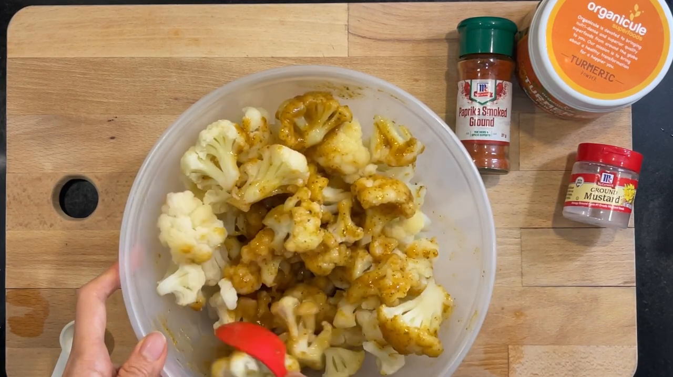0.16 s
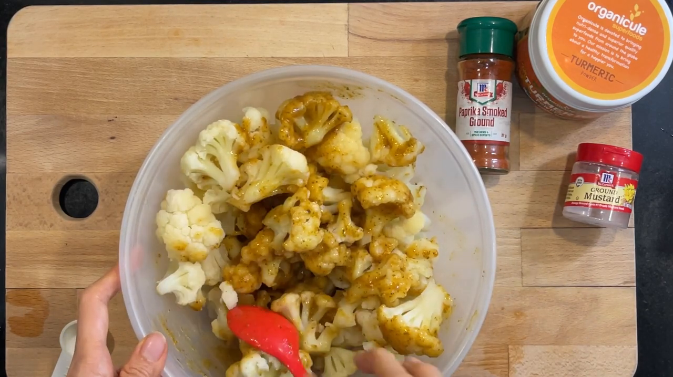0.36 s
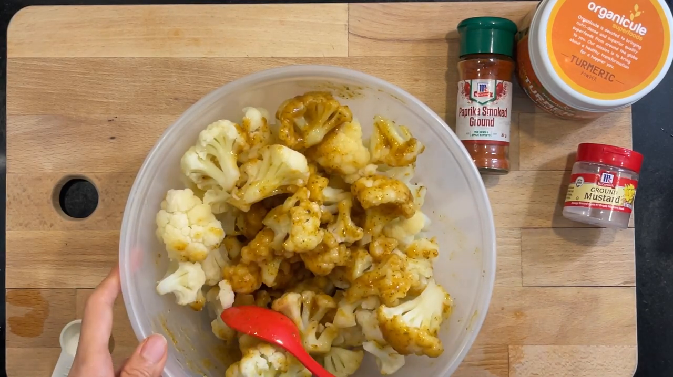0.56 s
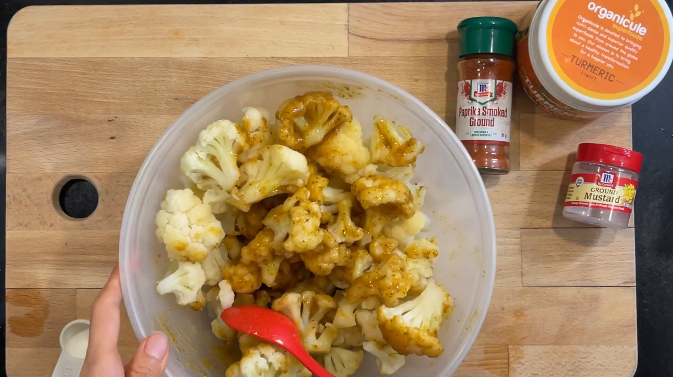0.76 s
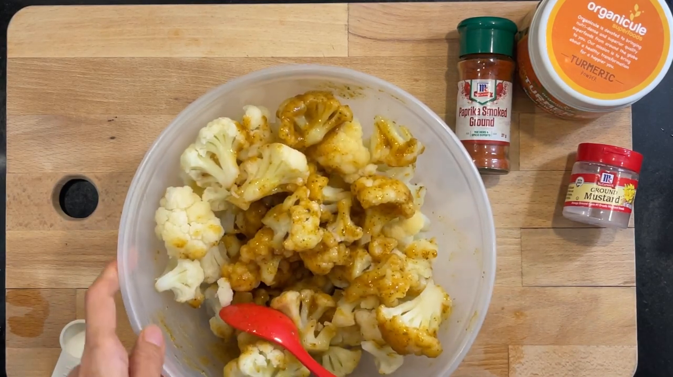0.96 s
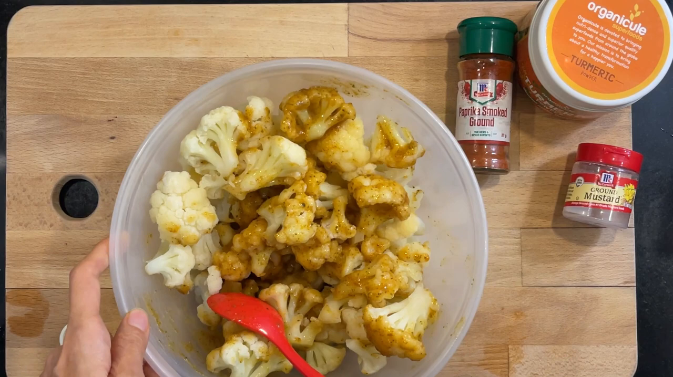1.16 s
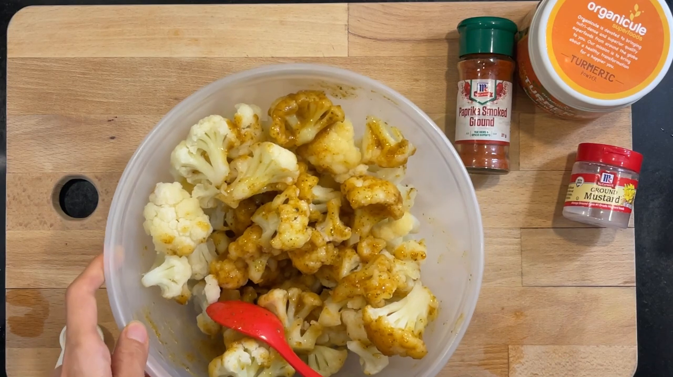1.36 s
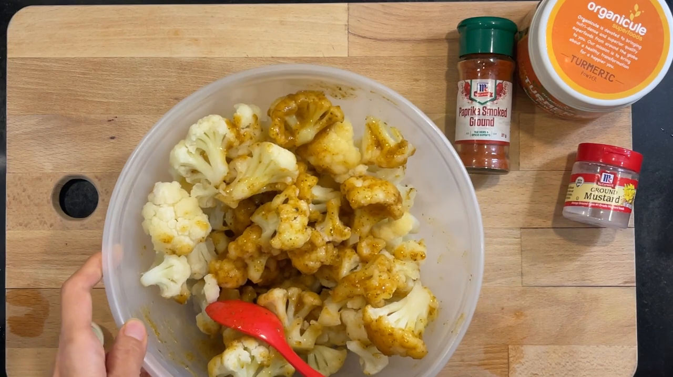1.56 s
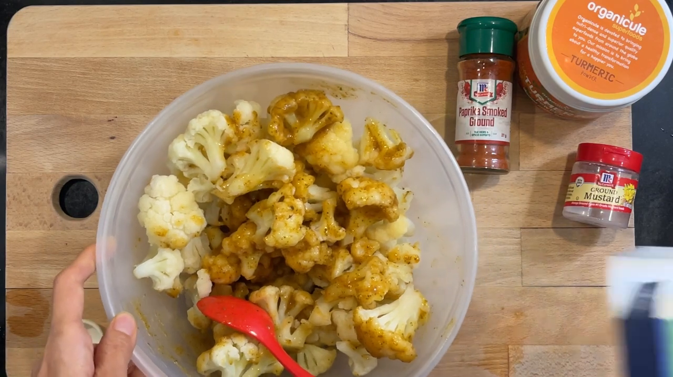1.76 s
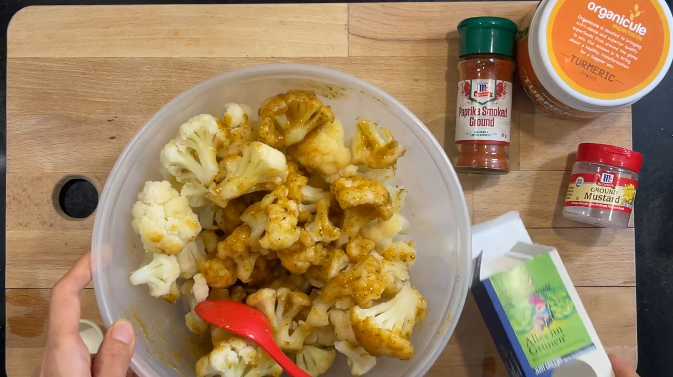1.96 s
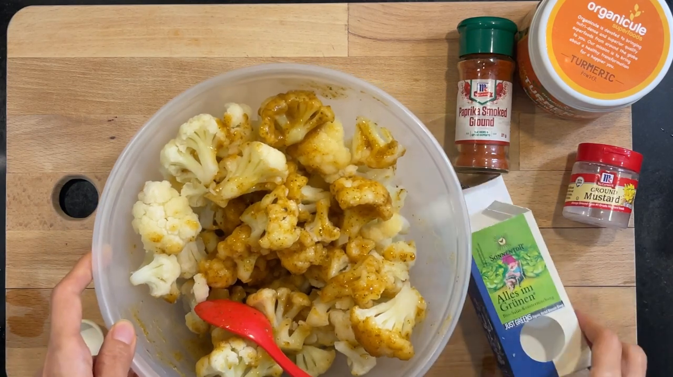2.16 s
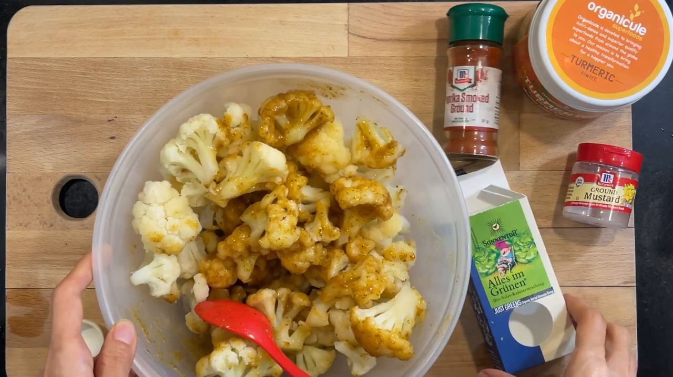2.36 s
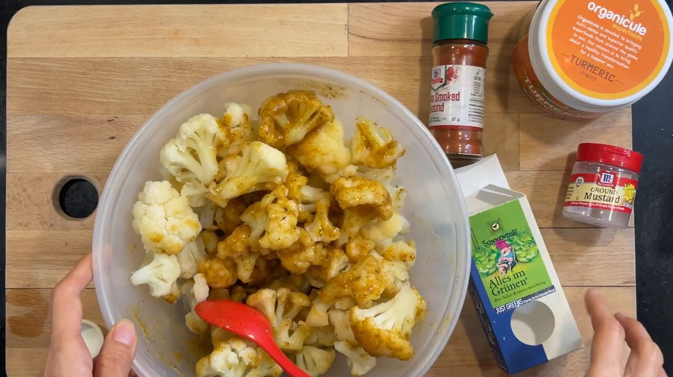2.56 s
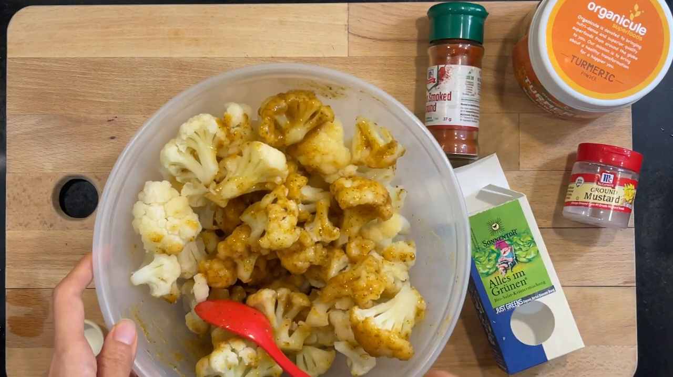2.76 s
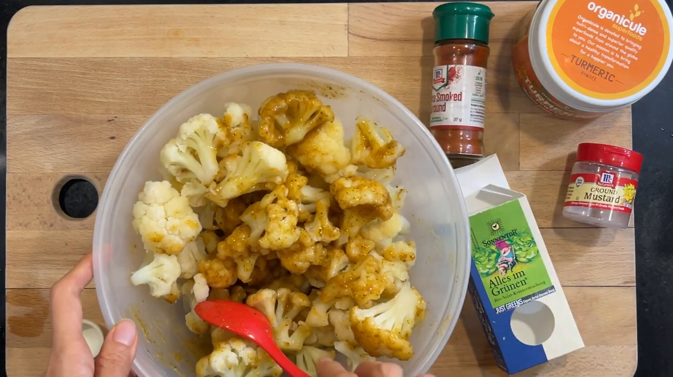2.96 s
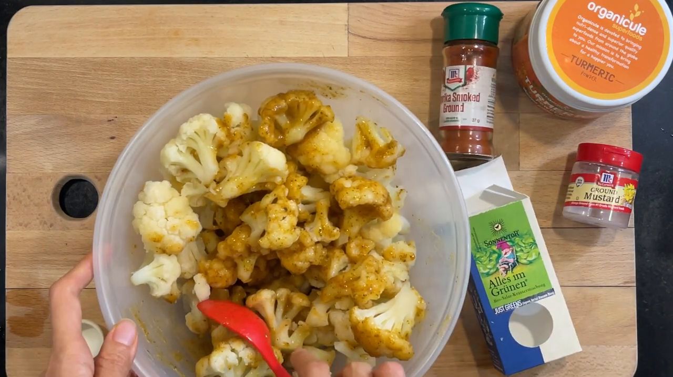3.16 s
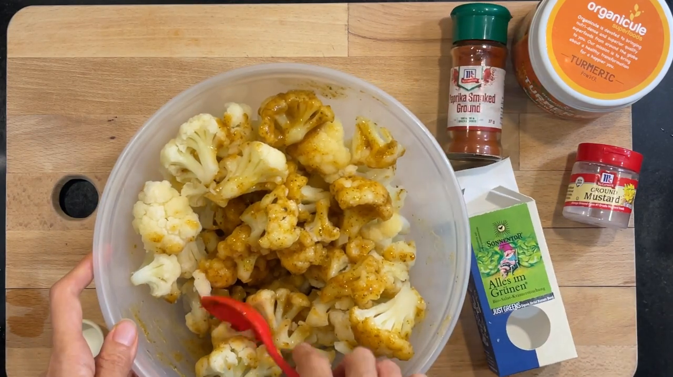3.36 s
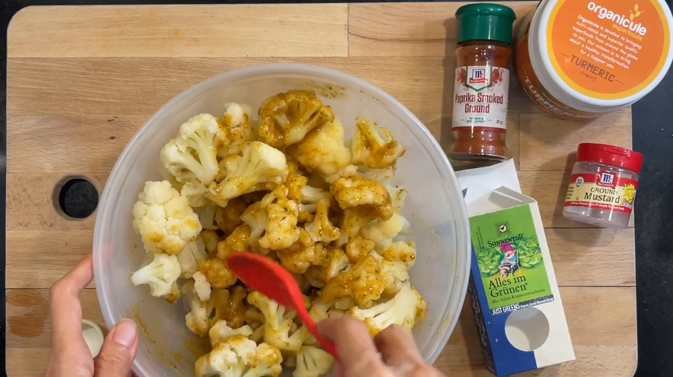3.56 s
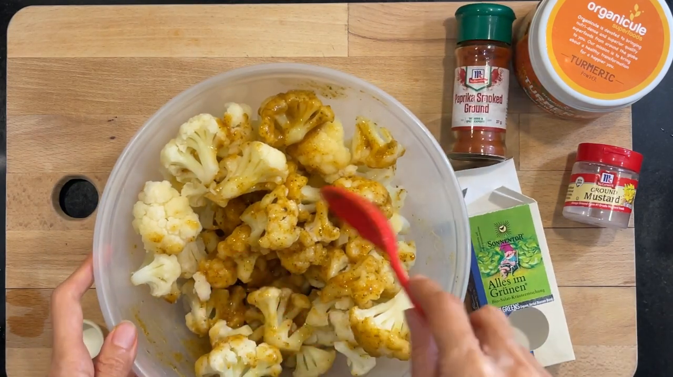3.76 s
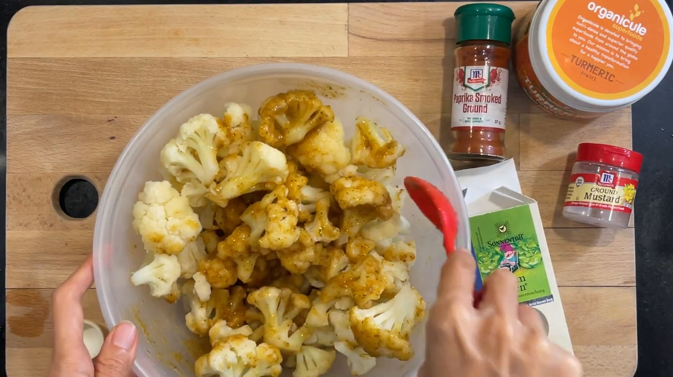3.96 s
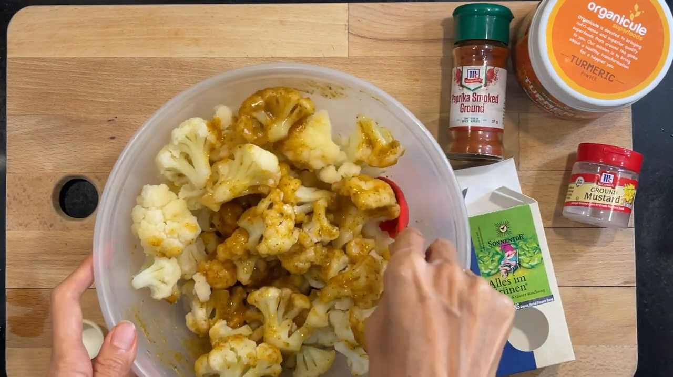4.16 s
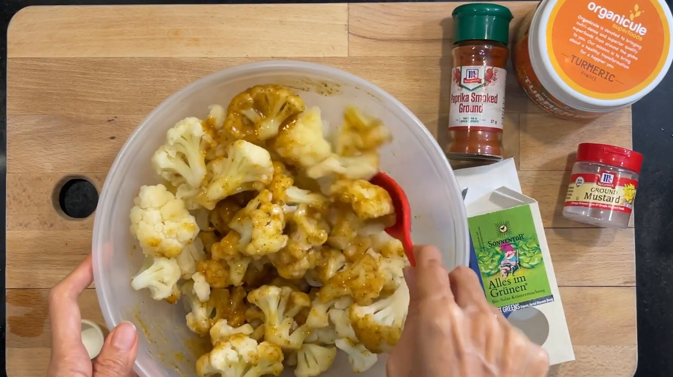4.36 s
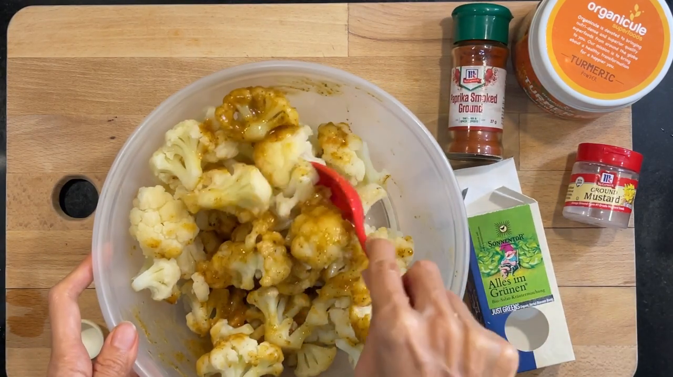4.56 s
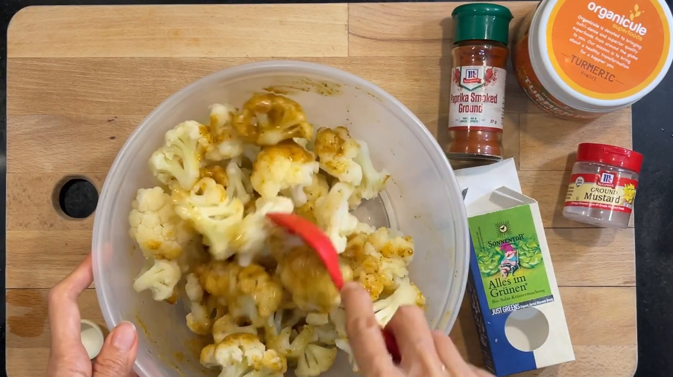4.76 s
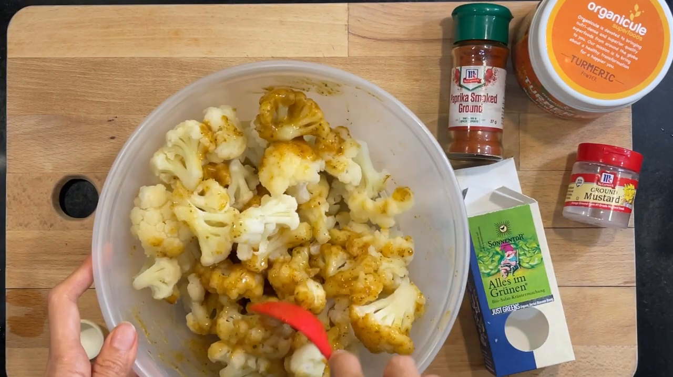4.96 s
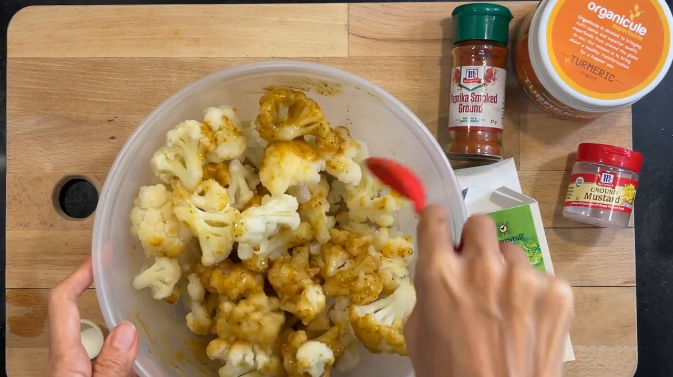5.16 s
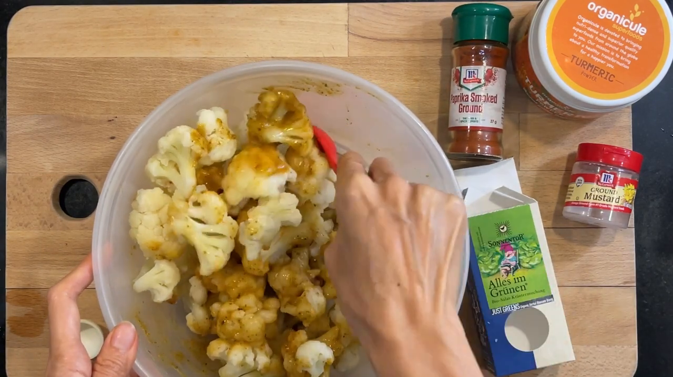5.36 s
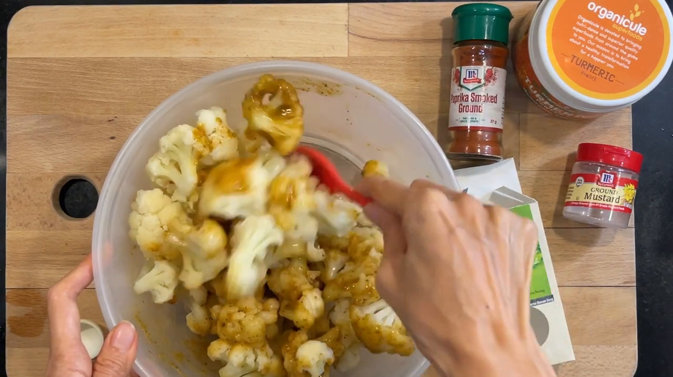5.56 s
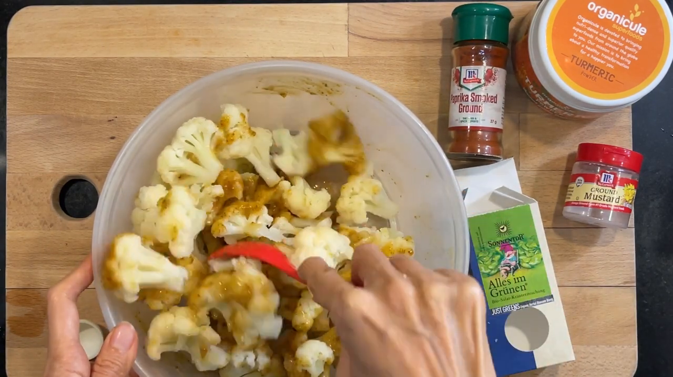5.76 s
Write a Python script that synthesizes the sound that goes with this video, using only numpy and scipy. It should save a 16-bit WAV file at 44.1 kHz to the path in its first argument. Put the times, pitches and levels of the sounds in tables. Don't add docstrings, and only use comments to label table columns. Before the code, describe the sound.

In a small kitchen, a spoon knocks a plastic bowl once sharply, then taps and scrapes lightly. A quiet stretch follows with faint hand and carton rustling and a brief glassy slide of a jar over wood. Later, tossing resumes with hard hollow knocks, clicks and short scrapes. A low uneven motor hum runs throughout, picked up by a close stereo phone.

```python
import sys
import numpy as np
from scipy import signal
from scipy.fft import rfft, irfft, next_fast_len
from scipy.io import wavfile
from scipy.ndimage import uniform_filter1d

SR = 44100
rng = np.random.default_rng(int(sys.argv[2]) if len(sys.argv) > 2 else 0)


def waveform_to_disk(signal):
    frames = np.transpose(np.atleast_2d(signal))
    scaled = np.clip(frames, -1, 1) * 32767
    samples = np.round(scaled).astype(np.int16)
    wavfile.write(sys.argv[1], SR, samples)


def natural_amplitude(level_db):
    exponent = np.asarray(level_db, float) / 20
    return 10 ** exponent


N = 256662

# middle_s, half_length_s, level_db
HUM_SURGES = [(0.17, 0.14, -37.5), (0.495, 0.09, -44), (0.794, 0.047, -44), (1.107, 0.13, -45.5),
              (1.48, 0.18, -38.5), (1.764, .08, -42), (2.046, 0.093, -41), (2.297, 0.17, -43),
              (2.57, 0.041, -40), (2.794, 0.082, -39), (3.113, 0.078, -37.5), (3.445, 0.041, -40.5),
              (3.645, 0.086, -47), (3.908, 0.059, -40), (4.103, 0.061, -33), (4.334, 0.21, -43.5),
              (4.875, 0.19, -38.5), (5.36, 0.14, -38), (5.824, 0.1, -37)]
# pitch_hz, width_hz, level_db
HUM_OVERTONES = [(117, 19, -60.5), (208.6, 38, -62.5), (329.1, 22, -67)]
# time_s, gain_db
OVERTONE_SWELL = [
    (0, 0),
    (1.1, 2.5),
    (1.4, 1),
    (1.9, 4.5),
    (2.3, 10.5),
    (2.7, -5),
]
# freq_hz, level_db
ROOM_AIR = [(22, -28), (46, -7), (92, 0.5), (140, -12), (270, -21), (500, -21), (800, -27.5), (1500, -34.5),
            (2500, -40), (5000, -49), (8000, -53), (10500, -45.5), (11600, -67), (12500, -84.5)]
# freq_hz, t60_s
KITCHEN_DECAY = [(200, 0.21), (700, 0.33), (2000, 0.28), (5000, 0.31), (12000, 0.3)]
# freq_hz, level_db
SIDE_COLOUR = [(60, -18), (250, -7), (500, -6), (1000, -4), (1600, -5), (2200, -15.5), (3500, -13.5),
               (5000, -10.5), (6000, -33), (9000, -19), (10200, -12.5), (12000, -15)]

# middle_s, half_length_s, fizz_db, rasp_over_fizz_db
BRUSHES = [(0.202, 0.033, -63.5, -16), (0.29, 0.047, -68.5, -14), (0.492, .12, -65.5, 6.5),
           (0.72, 0.097, -69, -23), (0.872, 0.12, -68, 4), (1.005, 0.017, -63, 6.5),
           (1.634, 0.098, -60.5, 6), (1.873, 0.09, -66.5, 5.5), (2.367, 0.077, -71.5, 10.5),
           (2.445, 0.018, -68, 1), (2.637, 0.053, -66.5, 4.5), (3.055, 0.23, -74.5, 8),
           (3.262, 0.093, -64.5, 5), (3.684, 0.075, -73, -5), (3.848, 0.12, -74.5, 12),
           (4.272, 0.093, -64.5, 5.5), (4.502, 0.077, -64.5, -0.5), (4.71, 0.1, -71, 1),
           (4.892, 0.0535, -66.5, -11), (5.406, 0.073, -67, 19), (5.562, 0.095, -63, 2),
           (5.674, 0.124, -64, 6.5)]
# time_s, level_db
JAR_SLIDE = [
    (2.015, -82),
    (2.033, -47.5),
    (2.241, -59.5),
    (2.327, -58),
    (2.355, -72),
    (2.38, -77),
]
# pitch_hz, width_hz, level_db
JAR_MODES = [(1010, 260, 1), (1970, 66, 4), (2290, 270, 6.5), (3270, 400, 2), (3570, 43, -10),
             (5440, 60, -1), (6550, 63, 0), (8350, 330, -5)]
# pitch_hz, level_db, t60_s
CLINK_MODES = [(5120, 0, .025), (5450, -25, .4), (6400, -2, .025), (4500, -8, .02), (7600, -8, .02)]

# start_s, click_db, click_pitch_hz, tick_db
LIGHT_TAPS = [(0.115, -36, 2600, -55), (0.756, -30, 850, -42), (0.775, -36, 2170, -44),
              (0.867, -32, 640, -47.5), (0.98, -44, 700, -49), (1.029, -43, 1160, -47.5),
              (1.056, -51, 1590, -48), (1.076, -50, 856, -49), (1.089, -32.5, 1560, -42),
              (1.11, -24.5, 1100, -45), (1.16, -31, 1080, -52), (1.174, -31.5, 1630, -55),
              (1.283, -37, 2300, -43), (1.291, -36.5, 880, -39), (1.314, -28.5, 2500, -40.5),
              (2.02, -39.5, 2290, -75), (2.169, -32, 900, -72), (3.036, -34, 930, -57),
              (3.776, -48.5, 754, -62.5), (3.972, -28.5, 940, -41.5), (4.0075, -27.5, 2420, -42.5),
              (4.355, -78.5, 705, -40.5), (4.687, -71.5, 832, -53.5), (4.731, -39, 755, -55),
              (4.787, -53, 2830, -39.5), (5.512, -39, 2230, -44), (5.569, -40, 2080, -42.5),
              (5.64, -31.5, 666, -49), (5.672, -45, 832, -48.5), (5.748, -43, 1590, -67)]
TIP_ROWS = [0, 1, 3, 4, 12, 17, 21, 22, 24, 28, 29, 32]
# start_s, click_db, click_pitch_hz, tick_db, length_ms
PITCHED_SKIDS = [(1.221, -51, 2200, -46, 13), (3.09, -64, 1800, -63.5, 40), (4.957, -62, 3100, -49, 2.8),
                 (4.851, -46, 2600, -50, 4.3), (5.256, -62, 2050, -56, 20), (4.816, -55, 2000, -47, 4.8),
                 (4.938, -52, 2500, -49, 2.6), (5.219, -42, 2800, -37, 3.4), (5.477, -55, 3000, -58, 3.2)]
# start_s, level_db, pitch_hz, t60_s
SINGLE_PINGS = [(0.303, -22, 2460, 0.03), (0.317, -20.5, 645, 0.04), (0.303, -22, 864, 0.061),
                (5.282, -14, 1450, .011), (4.104, -14.5, 646, 0.041), (5.295, -19, 652, 0.07),
                (0.762, -52, 4570, .12), (0.995, -54, 2730, .03), (0.995, -52, 5300, .03),
                (1.161, -46, 1040, .04), (4.095, -23, 1360, .03), (5.187, -17.5, 900, 0.026),
                (5.35, -34, 617, .08), (4.155, -35.5, 593, 0.3), (0.764, -39, 641, 0.11),
                (0.866, -41, 474, 0.045), (0.868, -52, 1380, .04), (0.998, -44, 326, 0.26),
                (1.03, -44, 1230, .04), (1.052, -46, 1650, .06), (1.052, -41, 1090, .04),
                (1.065, -42, 2780, 0.035), (1.074, -43, 3560, 0.02), (1.112, -42, 1670, .05),
                (1.175, -44, 1660, 0.056), (1.22, -41.5, 4950, .05), (1.232, -51, 4400, 0.046),
                (1.229, -52, 7800, .02), (1.254, -38, 596, 0.12), (1.291, -40, 3430, 0.013),
                (1.316, -39, 3230, 0.023), (1.321, -47.5, 1500, 0.15), (2.109, -70, 5560, .3),
                (2.3, -69, 3570, 0.68), (2.47, -72.5, 5480, 0.55), (3.037, -47, 727, 0.055),
                (4.092, -33, 1560, 0.04), (4.962, -26, 1594, 0.021), (4.963, -51, 1517, 0.28),
                (4.966, -39, 2290, 0.062), (5.187, -28.5, 763, 0.042), (5.189, -30, 2239, 0.087),
                (5.222, -31, 220, 0.094), (5.285, -17, 2570, 0.024), (5.512, -44, 2160, 0.037)]
# start_s, length_s, level_db, pitch_hz
WALL_SCUFFS = [(0.352, 0.019, -54, 750), (0.355, .02, -48, 1700), (1.066, 0.023, -50.5, 3600),
               (1.07, 0.012, -57, 5300), (1.088, .012, -56, 5200), (1.088, .012, -59, 4000),
               (1.108, 0.011, -51, 2400), (1.29, 0.0074, -48, 3500), (1.3135, 0.0069, -44, 3500),
               (1.3135, 0.0089, -49, 5000), (1.33, 0.069, -65, 2170), (2.035, 0.022, -65, 1000),
               (2.19, 0.078, -60.5, 1030), (2.31, .03, -63.5, 1800), (3.045, .02, -64, 7800),
               (3.085, .07, -65, 2460), (3.085, 0.059, -66, 1200), (4.035, 0.048, -50.5, 2400),
               (4.05, 0.025, -47, 1200), (4.105, 0.041, -52, 1900), (4.27, 0.07, -57, 590),
               (4.9625, 0.0066, -40, 3100), (4.0075, 0.0046, -41.5, 3600), (4.0075, 0.0054, -45, 7000),
               (3.9725, .006, -45.5, 2700), (3.78, 0.087, -67.5, 2500), (1.178, 0.062, -56, 7400),
               (5.266, 0.02, -31.5, 2150), (5.268, .012, -33.5, 1100), (5.287, .012, -30, 1950),
               (5.226, 0.013, -47, 3300), (5.222, 0.023, -40, 730), (5.25, .03, -37.5, 2000),
               (5.255, 0.034, -39, 1170), (5.25, 0.016, -41, 3500), (5.35, 0.023, -46.5, 2160),
               (5.39, 0.036, -45.5, 605), (5.44, .015, -68, 3100), (4.358, .018, -52, 11200),
               (4.381, .007, -52.5, 3400), (4.843, .006, -58.5, 3100), (4.3, .025, -56, 10600),
               (5.766, 0.015, -57, 7100), (5.516, .008, -57, 10000), (0.307, 0.086, -51, 3700),
               (2.03, 0.19, -66.5, 4300), (5.295, 0.046, -39, 2000), (5.474, 0.0071, -63, 3300),
               (5.47, 0.021, -50.5, 660)]
# start_s, hardest_s, end_s, fizz_db, rasp_and_rumble_over_fizz_db
SPOON_STROKES = [(0.0, 0.013, 0.037, -52.5, -4), (0.028, 0.13, 0.17, -53, -0.5),
                 (0.75, 0.758, 0.81, -54.5, -7), (1.021, 1.1, 1.32, -66, 9.5),
                 (1.058, 1.07, 1.096, -59.5, 7), (1.168, 1.12, 1.325, -51.5, -9),
                 (1.28, 1.284, 1.33, -53, -1.5), (1.312, 1.28, 1.37, -54, 6),
                 (4.007, 4.008, 4.165, -45.5, 0.5), (4.351, 4.386, 4.4, -52, -4.5),
                 (4.739, 4.785, 4.78, -56, -11), (5.19, 5.238, 5.27, -45, 5),
                 (5.247, 5.28, 5.287, -45.5, 5.5)]
# freq_hz, level_db
FIZZ_COLOUR = [(2000, -17.5), (3200, -0.5), (4200, -1.5), (6500, -1), (8500, 0.5), (10500, 6.5), (11300, 4),
               (12200, -20.5), (13000, -18.5), (14200, -36), (15700, -25), (16500, -48.5)]
RASP_COLOUR = [(500, -5), (900, -2), (1400, -2), (1800, -2.5), (2300, -2), (3200, -11), (4500, -36)]
RUMBLE_COLOUR = [(120, -20.5), (220, 0), (400, -4), (630, 1.5), (900, -24), (1500, -51)]

# start_s, snap_db, snap_pitch_hz, tick_db
SPOON_SNAPS = [(0.3026, -17.5, 2780, -22.5), (0.415, -39.5, 2660, -50), (0.766, -55, 2150, -48.5),
               (1.254, -52, 2180, -68), (4.032, -51, 2290, -71), (4.093, -14, 2310, -20.5),
               (4.3966, -37.5, 1890, -44.5), (4.9054, -46, 2420, -60.5), (4.964, -24, 2550, -44),
               (5.1871, -17.5, 2250, -36.5), (5.2834, -15, 2474, -20), (5.614, -45.5, 2040, -56.5),
               (5.7132, -43.5, 2540, -55), (5.777, -44, 1930, -54)]
# freq_hz, level_db
CRACK_COLOUR = [(2500, -24.5), (3500, 8), (5000, 0), (8000, -0.5), (10500, 10), (12000, 2.5),
                (13700, -33.5), (15600, -16), (16500, -35)]
# pitch_hz, level_db, t60_s
RIM_MODES = [(4740, -4.5, 0.0065), (7580, -2, 0.0067)]
# start_s, body_db, blow_pitch_hz, thud_db, click_db
BOWL_KNOCKS = [(0.302, -8.5, 713, -34, -17.5), (0.415, -29, 664, -50, -44), (0.766, -42, 664, -63, -62),
               (1.003, -64, 630, -47.5, -68), (1.255, -39.5, 535, -51.5, -55),
               (4.031, -32.5, 660, -33.5, -39), (4.093, -6, 594, -25.5, -14),
               (4.397, -26.5, 707, -38.5, -36), (4.905, -46, 460, -43, -80.5),
               (4.963, -36.5, 590, -39, -34), (5.186, -18, 530, -27.5, -31.5),
               (5.284, -6.5, 646, -24.5, -13), (5.614, -35.5, 572, -49, -50),
               (5.712, -40.5, 487, -42.5, -59), (5.778, -38, 600, -49, -45.5), (0.07, -58, 560, -50, -60)]
# pitch_hz, level_db, t60_s
BOARD_MODES = [(77.4, -12.5, 0.32), (196.7, 2, 0.076), (312.3, 5, 0.055), (392.5, 0, 0.04)]
BOWL_MODES = [(549, -10, 0.1), (585.5, -3.5, 0.17), (645.6, 4.5, 0.1), (705, -11.5, 0.1), (811, -9.5, 0.2),
              (858, -11.5, 0.098), (1120, -13.5, 0.15), (1050, -15, 0.13)]
CLICK_MODES = [(1349, -1.5, 0.025), (1442, 5.5, 0.018), (1590, -4.5, 0.03), (1235, -10, 0.018)]

# freq_hz, phase_rad
CAPSULE_LEAD = [(300, 0), (600, -.35), (1400, -.25), (2150, 0), (3200, .65), (5000, .45), (5900, .05),
                (7300, .1), (7900, .42), (8600, 0), (9130, -1.25), (10220, -3.14), (11200, -4.9),
                (11900, -6.28), (12600, -6.6), (16000, -12)]
# freq_hz, level_db
CAPSULE_TILT = [(60, 0), (180, 3.5), (550, 1), (1650, 2), (4970, 1), (15000, 0.5)]


def evened(x):
    return x / np.sqrt(np.mean(x ** 2) + 1e-20)


def read(points, hz):
    f, value = np.transpose(points)
    return np.interp(np.log(hz + 1), np.log(f + 1), value)


def colour(x, points):
    size = next_fast_len(x.shape[-1], True)
    gain = natural_amplitude(read(points, np.fft.rfftfreq(size, 1 / SR)))
    return irfft(rfft(x, size) * gain, size)[..., :x.shape[-1]]


def add(mix, start_s, sound):
    part = mix[round(start_s * SR):][:len(sound)]
    part += sound[:len(part)]


def fuzzy(x, peaks):
    size = next_fast_len(N, True)
    f = np.fft.rfftfreq(size, 1 / SR)
    shape = sum(natural_amplitude(db) / np.sqrt(width) / (1 + (2 * (f - hz) / width) ** 2) for hz, width, db in peaks)
    return irfft(rfft(x, size) * shape, size)[:N] * np.sqrt(2 * SR / np.pi)


def ring(modes, t, chance, spread_db, rise_s):
    out = np.zeros(len(t))
    for (hz, db, t60), weight, detune in zip(modes, chance, chance[::-1]):
        decay = natural_amplitude(db + spread_db * weight - 60 * t / t60)
        out += decay * np.sin(2 * np.pi * hz * (1 + 0.019 * detune) * t)
    out = out * (1 - np.exp(-t / rise_s))
    return out / abs(out).max()


def swells(middle_s, half_s, db):
    t = np.arange(0, N, 128)[:, None] / SR
    level = np.linalg.norm(natural_amplitude(db - 6 * abs((t - middle_s) / half_s) ** 1.6), axis=1)
    return np.interp(np.arange(N) / SR, t[:, 0], level)


def slips(per_s, size_db):
    size = natural_amplitude(size_db * np.minimum(rng.exponential(1, N), 5)) * rng.choice([-1, 1], N)
    clicks = size * (rng.random(N) < per_s / SR)
    return evened(clicks) + 0.56 * rng.standard_normal(N)


def specked(x):
    z = signal.stft(x, nperseg=256)[2]
    patch = uniform_filter1d(rng.standard_normal(z.T.shape), size=4, axis=0)
    patch = uniform_filter1d(patch, size=3, axis=1)
    return signal.istft(z * natural_amplitude(3.5 * evened(patch.T)), nperseg=256)[1][:N]


def appliance_hum():
    narrow = evened(fuzzy(rng.standard_normal(N), [(64.33, 11.1, 0)]))
    wander = signal.hilbert(narrow, next_fast_len(N))[:N]
    partly_levelled = (wander / (abs(wander) + 0.26)).real
    steady = evened(colour(partly_levelled, [(30, -29.0), (50, -8.5)]))
    tone = swells(*np.transpose(HUM_SURGES)) * steady
    swell = natural_amplitude(np.interp(np.arange(N) / SR, *np.transpose(OVERTONE_SWELL)))
    lowest = swell * fuzzy(rng.standard_normal(N), HUM_OVERTONES[:1])
    upper = fuzzy(rng.standard_normal(N), HUM_OVERTONES[1:])
    air = natural_amplitude(-50.5) * evened(colour(rng.standard_normal((2, N)), ROOM_AIR))
    return tone + lowest + upper + air[0], air[1]


def smeared(x):
    wobble_hz = 260.1 * evened(uniform_filter1d(rng.standard_normal(N), size=60))
    phase = 2 * np.pi * np.cumsum(wobble_hz) / SR
    return (signal.hilbert(x, next_fast_len(N))[:N] * np.exp(1j * phase)).real


def kitchen(x):
    echoes = np.zeros((2, SR // 2))
    at = np.arange(220, SR // 2 - 20, 20) + rng.integers(0, 20, (2, (SR // 2 - 221) // 20))
    np.put_along_axis(echoes, at, rng.choice([-1., 1.], at.shape), 1)
    hz, t, z = signal.stft(echoes, SR, nperseg=256)
    decay = natural_amplitude(-60 * t / read(KITCHEN_DECAY, hz)[:, None])
    tail = signal.istft(z * decay, SR, nperseg=256)[1]
    return signal.fftconvolve(x[None], tail / np.linalg.norm(tail[0]), axes=1)[:, :N]


def brushing():
    drive = slips(per_s=8900.0, size_db=3.0)
    middle_s, half_s, fizz_db, rasp_db = np.transpose(BRUSHES)
    fizz = swells(middle_s, half_s, fizz_db + 2.0) * evened(colour(drive, FIZZ_COLOUR))
    rasp = swells(middle_s, half_s, fizz_db + rasp_db - 5.0) * evened(colour(drive, RASP_COLOUR))
    return fizz + rasp


def glass_jar():
    s, db = np.transpose(JAR_SLIDE)
    t = np.arange(N) / SR
    fade = np.clip(np.minimum(t - s[0], s[-1] - t) / 0.0058, 0, 1)
    drive = slips(per_s=2400.0, size_db=-0.5)
    glass = np.zeros(N)
    for mode in JAR_MODES:
        sway = natural_amplitude(2.2 * evened(uniform_filter1d(rng.standard_normal(N), 1500)))
        glass += sway * fuzzy(drive, [mode])
    fizz, rasp = (evened(colour(drive, c)) for c in (FIZZ_COLOUR, RASP_COLOUR))
    out = fade * natural_amplitude(np.interp(t, s, db)) * evened(evened(glass) + 1.66 * fizz + 0.27 * rasp)
    graze = rng.standard_normal(900) * np.hanning(900)
    glass_ring = ring(CLINK_MODES, np.arange(SR // 4) / SR, np.zeros(5), spread_db=0, rise_s=0.0031)
    clink = signal.fftconvolve(graze, glass_ring)
    add(out, 2.432, natural_amplitude(-54) * clink / abs(clink).max())
    return out


def light_taps():
    edge_hz, tip_hz, tap_ms = 3450, 7410, 5.5
    t, out = np.arange(4096) / SR, np.zeros(N)
    rows = [tuple(row) + (tap_ms,) for row in LIGHT_TAPS] + list(PITCHED_SKIDS)
    grit = rng.standard_normal((len(rows), 2, len(t)))
    for k, ((s, click_db, hz, tick_db, ms), g) in enumerate(zip(rows, grit)):
        tick_hz = (tip_hz if k in TIP_ROWS else edge_hz) * (1 + 0.088 * g[1, -1])
        shape = (1 - np.exp(-t / 0.0019)) * np.exp(-1000 * t / ms)
        click_colour = [(hz / 3, -30), (hz * 0.69, -9), (hz, 0), (hz * 1.2, -9), (hz * 4.75, -24), (12000, -60)]
        click = evened(colour(g[0], click_colour))
        tick_colour = [(tick_hz, -11), (tick_hz, 0), (tick_hz * 1.5, -11)]
        tick = evened(colour(colour(g[1], FIZZ_COLOUR), tick_colour))
        add(out, s - .0005, shape * (natural_amplitude(click_db - 6.0) * click + natural_amplitude(tick_db) * tick))
    return out


def single_pings():
    t, out = np.arange(SR // 2) / SR, np.zeros(N)
    for s, db, hz, t60 in SINGLE_PINGS:
        add(out, s, natural_amplitude(db - 60 * t / t60) * (1 - np.exp(-t / 0.0016)) * np.sin(2 * np.pi * hz * t))
    return out


def wall_scuffs(drive):
    width, lean = 1.2, .75
    out = np.zeros(N)
    for s, length_s, db, hz in WALL_SCUFFS:
        u = np.linspace(0, 1, round(length_s * SR))
        grit = np.tanh(drive[round(s * SR):][:len(u) + 2048])
        patch = [(hz / 2, -40), (hz / width, -12), (hz, 0), (hz * width, -12), (hz * 2, -40)]
        band = colour(grit, patch)[:len(u)]
        add(out, s, natural_amplitude(db) * np.sqrt(abs(np.sin(np.pi * u ** lean))) * evened(band))
    return out


def spoon_strokes():
    gained_db, lost_db = 8.5, 17.5
    shudder = natural_amplitude(0.7 * evened(uniform_filter1d(rng.standard_normal(N), 300)))
    drive = specked(slips(per_s=3000., size_db=0.5)) * shudder
    fizz, rasp, rumble = (evened(colour(drive, c)) for c in (FIZZ_COLOUR, RASP_COLOUR, RUMBLE_COLOUR))
    out = wall_scuffs(drive)
    for start, hardest, end, db, weight_db in SPOON_STROKES:
        at = np.arange(round(start * SR), round(end * SR))
        t = at / SR
        fade = np.clip(np.minimum(t - start, end - t) / 0.0021, 0, 1)
        press_db = np.interp(t, [start, hardest, end], [-gained_db, 0, -lost_db])
        low = natural_amplitude(0.67 * press_db - 3.5) * rasp[at] + natural_amplitude(0.14 * press_db - 9.0) * rumble[at]
        out[at] += fade * natural_amplitude(db + 2.5) * (natural_amplitude(press_db) * fizz[at] + natural_amplitude(weight_db) * low)
    return out


def spoon_snaps():
    t, out = np.arange(4096) / SR, np.zeros(N)
    crack_shape = (1 - np.exp(-t / 0.00028)) * (np.exp(-t / 0.00078) + 0.44 * np.exp(-t / 0.007))
    for (s, snap_db, hz, tick_db), g in zip(SPOON_SNAPS, rng.standard_normal((len(SPOON_SNAPS), len(t)))):
        tones = [(hz * 0.88, -4, .008), (hz, 0, .008), (hz * 1.153, -3, .008), (hz * 1.3, -8, .005)]
        crack = evened(colour(g, CRACK_COLOUR)) * crack_shape
        rim = ring(RIM_MODES, t, g[4:6], spread_db=9.0, rise_s=0.00059)
        add(out, s - .0007, natural_amplitude(tick_db + 6) * crack)
        add(out, s - .0004, natural_amplitude(tick_db + 2.5) * rim)
        add(out, s - .0002, natural_amplitude(snap_db + 3.5) * ring(tones, t, g[:4], spread_db=6.0, rise_s=0.0016))
    return out


def bowl_knocks():
    t, out = np.arange(8192) / SR, np.zeros(N)
    high_hz, low_hz, sag_s, thump_s = 900, 179, 0.00596, 0.0052
    turns = low_hz * t + (high_hz - low_hz) * sag_s * (1 - np.exp(-t / sag_s))
    thump = np.sin(2 * np.pi * turns) * np.e * t / thump_s * np.exp(-t / thump_s)
    chances = rng.standard_normal((len(BOWL_KNOCKS), 3, 8))
    for (s, body_db, hz, thud_db, click_db), chance in zip(BOWL_KNOCKS, chances):
        sagging_t = t + 0.0004 * (1 - np.exp(-t / 0.00029))
        blow = np.sin(2 * np.pi * hz * sagging_t) * t * np.exp(-t / 0.0015)
        near = [(f, db - 6.9 * abs(np.log2(f / hz)), t60) for f, db, t60 in BOWL_MODES]
        body_ring = ring(near, t, chance[0], spread_db=2.5, rise_s=0.0056)
        body = blow / abs(blow).max() + natural_amplitude(-14.5) * body_ring
        click = ring(CLICK_MODES, t, chance[1], spread_db=3.0, rise_s=0.001)
        board = ring(BOARD_MODES, t, chance[2], spread_db=7.0, rise_s=0.01)
        add(out, s, natural_amplitude(click_db + 4.5) * click)
        add(out, s + 0.00028, natural_amplitude(body_db - 0.64) * body)
        add(out, s + 0.0019, natural_amplitude(thud_db - 0.5) * thump)
        add(out, s + 0.00055, natural_amplitude(thud_db + 3.5) * board)
    return out


def scene():
    near = bowl_knocks() + spoon_snaps() + single_pings() + light_taps()
    near = near + spoon_strokes() + glass_jar() + brushing()
    wet = natural_amplitude(-11.0) * kitchen(0.22 * near + smeared(near))
    background, other_air = appliance_hum()
    mid = near + wet[0] + background
    side = colour(1.28 * wet[1] + other_air, SIDE_COLOUR)
    return np.array([mid + side, mid - side])


def band_gate(x):
    treble_hz, treble_db, side_hz, side_db = 11700, -101, 1837, -17.5
    hz, _, z = signal.stft(np.array([x[0] + x[1], x[0] - x[1]]) / 2, SR, nperseg=1024)
    hz = hz[:, None]
    power = uniform_filter1d(uniform_filter1d(abs(z) ** 2, size=8, axis=1), size=2, axis=2)
    level_db = 10 * np.log10(power + 1e-20)
    floor_db = treble_db + np.minimum(9.0 * (hz - treble_hz) / 1000, 15) - 10 * (hz > 14600)
    keep = (hz < treble_hz) | (level_db > floor_db)
    keep &= (hz < side_hz) | (level_db > level_db[::-1] + side_db)
    mid, side = signal.istft(z * keep, SR, nperseg=1024)[1][:, :N]
    return np.array([mid + side, mid - side])


def band_limit(x):
    return signal.sosfilt(signal.butter(12, 16820, fs=SR, output="sos"), x)


def record(dry):
    headroom = 1.4
    size = next_fast_len(N, True)
    hz = np.fft.rfftfreq(size, 1 / SR)
    capsule = natural_amplitude(read(CAPSULE_TILT, hz) / 2) * np.exp(.5j * read(CAPSULE_LEAD, hz))
    pair = irfft(rfft(dry, size) * np.array([capsule, 1 / capsule]), size)[:, :N]
    mix = band_gate(headroom * np.tanh(pair / headroom))
    return band_limit(mix)


dry = scene()
out = record(dry)
waveform_to_disk(out)
```